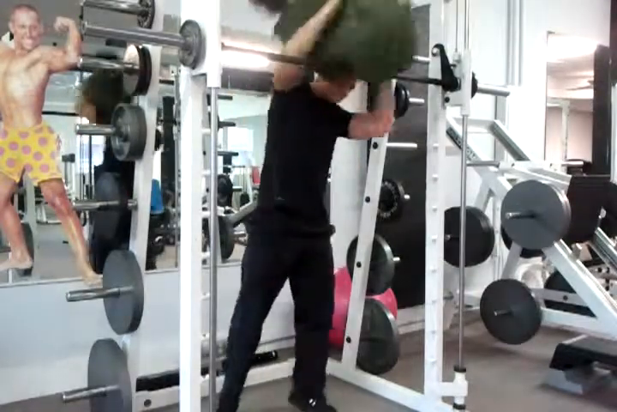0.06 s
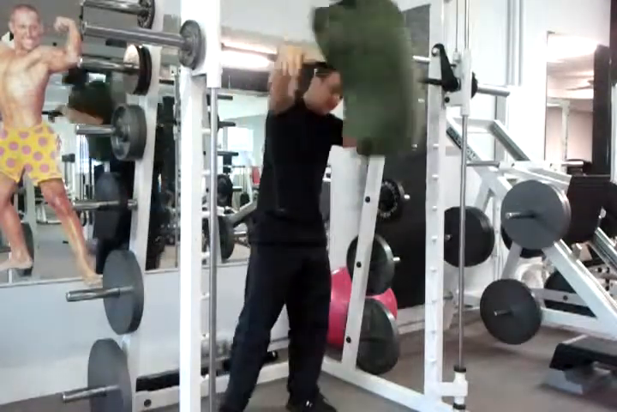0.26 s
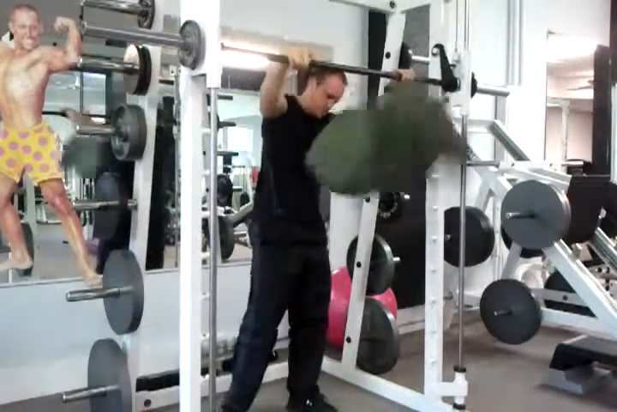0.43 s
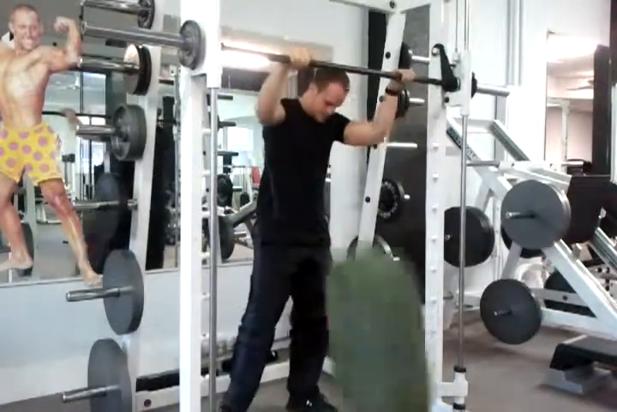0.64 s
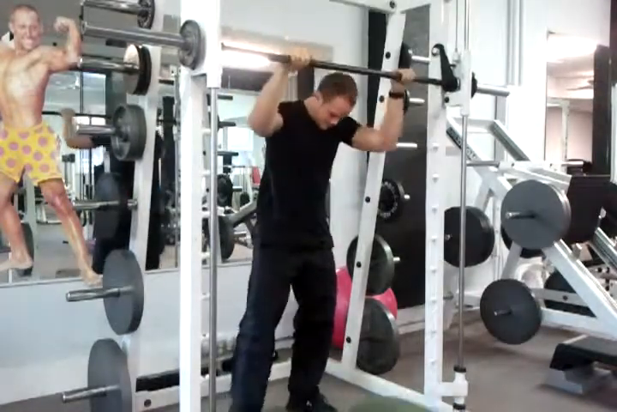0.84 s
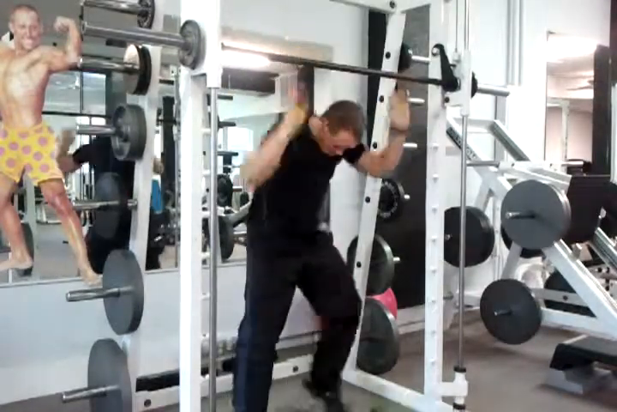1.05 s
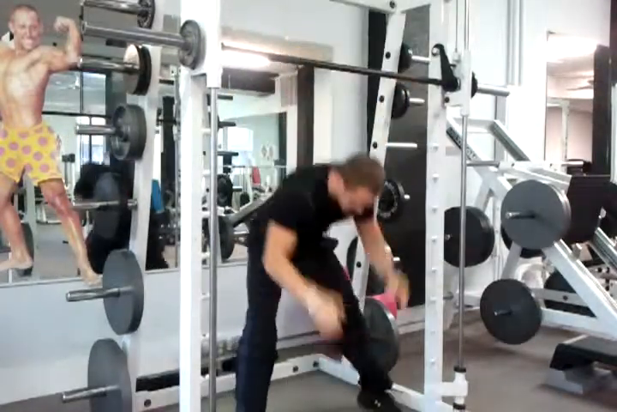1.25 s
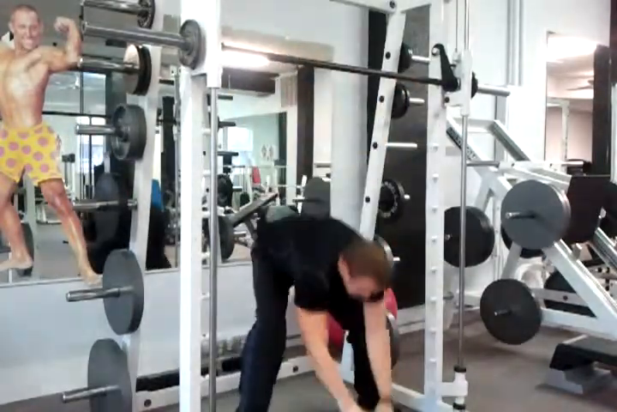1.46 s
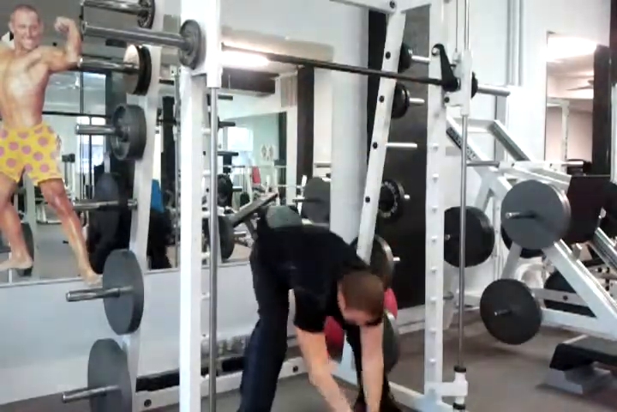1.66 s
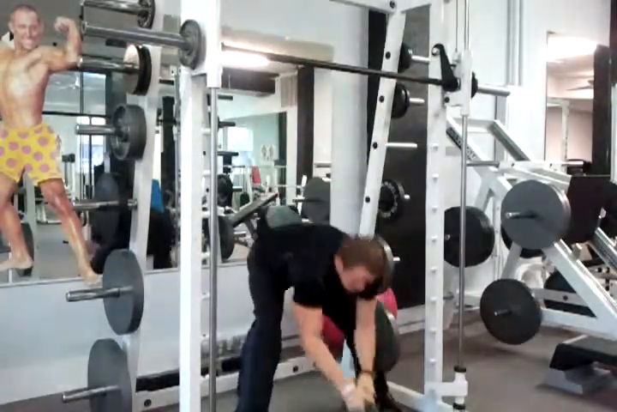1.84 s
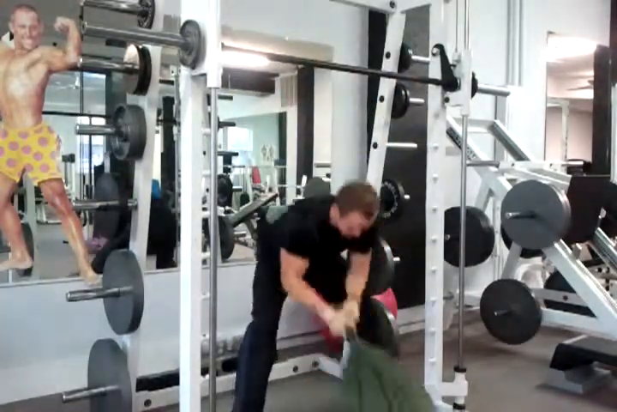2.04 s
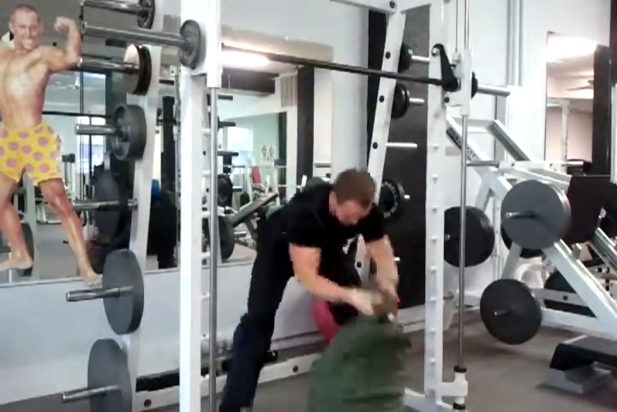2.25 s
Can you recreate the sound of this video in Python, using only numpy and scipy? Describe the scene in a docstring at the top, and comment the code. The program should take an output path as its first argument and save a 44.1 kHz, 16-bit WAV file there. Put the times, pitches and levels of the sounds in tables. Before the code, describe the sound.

A heavy sandbag clanks a steel bar, then slams onto an echoing gym floor

```python
"""Canvas rubs and sand shifts faintly in an echoing gym, then a steel bar clanks in its rack and rings.
A heavy sandbag is pushed over the bar, bumps the frame, falls and lands with a long thud.
Feet step up, the canvas is gathered and the bag is hauled off the floor.
Contacts, cloth and sand are shaped noise; the steel and the floor ring as decaying sines.
The hall adds early echoes and a diffuse tail; the two big blows overload a small mono recorder."""
import sys
import numpy as np
from scipy import signal
from scipy.fft import rfft, irfft
from scipy.io import wavfile

SR = 44100
rng = np.random.default_rng(int(sys.argv[2]) if len(sys.argv) > 2 else 0)


def master(y):
    """Save y as 16-bit WAV."""
    cut = np.clip(np.atleast_2d(y).T, -1, 1)
    pcm = np.round(cut * 32767)  # scale
    wavfile.write(sys.argv[1], SR, pcm.astype(np.int16))


N = 101430  # samples, 2.3 s
BAND_EDGE_HZ = 7980  # top of every noise and of the recorder


def from_db(db):
    """Decibels to amplitude gain."""
    return 10 ** (np.asarray(db) / 20)


def rms_one(x):
    """Scale to unit rms."""
    return x / np.sqrt(np.mean(x ** 2) + 1e-20)


def seconds():
    """The time of every sample."""
    return np.arange(N) / SR


def level_curve(points):
    """Gain that glides, in decibels, through (time_s, level_db) points."""
    return from_db(np.interp(seconds(), *np.transpose(points)))


def at_hz(points, hz):
    """Read a table on a log-frequency axis."""
    known_hz, values = np.transpose(points)
    return np.interp(np.log(hz + 1e-9), np.log(known_hz), values)


def noise(colour):
    """Unit-rms noise with the given spectrum, from 20 Hz up to the band edge."""
    hz = np.fft.rfftfreq(N, 1 / SR)
    in_band = (hz > 20) & (hz < BAND_EDGE_HZ)
    spectrum = rfft(rng.standard_normal(N)) * from_db(at_hz(colour, hz))
    return rms_one(irfft(spectrum * in_band, N))


def grain(depth_db, per_s):
    """A fast random flutter of level, of unit power."""
    steps = rng.standard_normal(N)
    flutter = np.interp(seconds() * per_s, np.arange(N), steps)
    return rms_one(from_db(depth_db * flutter))


def blow(start_s, level_db, attack_s, t60_s):
    """Envelope with a straight rise and an exponential fall."""
    age = seconds() - start_s
    rise = np.clip(age / attack_s, 0, 1)
    return rise * from_db(level_db - 60 * np.maximum(age - attack_s, 0) / t60_s)


def blows(rows):
    """Joint envelope of several blows, whose powers add."""
    return np.sqrt(sum(blow(*row) ** 2 for row in rows))


def ring(start_s, modes, attack_s, hold_s):
    """Sines that build up, hold while the contact lasts, then die away."""
    age = seconds() - start_s
    rise = np.clip(age / attack_s, 0, 1)
    free = np.maximum(age - attack_s - hold_s, 0)
    total = 0
    for pitch_hz, level_db, t60_s in modes:
        sine = np.sin(2 * np.pi * (pitch_hz * age + rng.random()))  # random starting phase
        total = total + from_db(level_db - 60 * free / t60_s) * sine
    return rise * total


def low_pass(x, hz):
    """A very steep low-pass that adds no delay."""
    taps = signal.firwin(801, hz, fs=SR, window=("kaiser", 9))
    return signal.fftconvolve(x, taps, "same")


# spectrum of the room tone: pitch_hz, density_db (relative, per Hz)
AIR_COLOUR = [(25, -42), (60, -18), (110, -6.5), (190, 3.5), (280, -3.5), (500, -1), (1000, -17.5),
              (2000, -28), (8000, -18.5)]
AIR_DB = -45


def room_tone():
    """Steady, low-pitched noise of the air in the room."""
    return from_db(AIR_DB) * noise(AIR_COLOUR)


# rubbing of the canvas: time_s, level_db
RUB = [(0, -45), (.07, -39), (.14, -35), (.2, -36), (.45, -36), (.6, -46.5), (.78, -47.5), (1.35, -49.5),
       (1.48, -37.5), (1.6, -42.5), (1.72, -43.5), (1.88, -50), (1.97, -44), (2.05, -35), (2.14, -29.5),
       (2.3, -30)]
# short scuffs of canvas and soles: start_s, level_db, attack_s, t60_s
SCUFFS = [(0.796, -27, 0.015, .2), (1.115, -24.5, .035, 0.11), (1.365, -40.5, 0.004, 0.3),
          (1.43, -36, 0.016, 0.24), (1.755, -38.5, 0.0096, 0.13)]
# spectrum of the cloth: pitch_hz, density_db (relative, per Hz)
CANVAS_COLOUR = [(100, -24), (500, -4), (1200, -4), (2200, -5), (4000, -3), (5500, -4), (7200, 1),
                 (8000, 5.5)]
CANVAS_ROOM_DB = -3  # send into the hall


def canvas():
    """Grainy friction of the coarse cloth: long rubs and short scuffs."""
    friction = np.hypot(level_curve(RUB), blows(SCUFFS))
    return noise(CANVAS_COLOUR) * grain(depth_db=1, per_s=650) * friction


# the sand shifts as the bag is heaved: time_s, level_db
HEAVE = [(0, -40.5), (.1, -34), (.2, -27), (.5, -28.5), (.72, -38), (.8, -33), (1.3, -55), (1.5, -46.5),
         (1.9, -42.5), (1.98, -33.5), (2.1, -32), (2.3, -36)]
# spectrum of the filling: pitch_hz, density_db (relative, per Hz)
SAND_COLOUR = [(30, -46), (100, -21.5), (190, -13.5), (300, -1.5), (480, 2.5), (850, 2.5), (1400, -3),
               (2500, -9), (8000, -31)]


def sand():
    """Dull, lumpy rustle of the filling as the bag bends."""
    return noise(SAND_COLOUR) * grain(depth_db=0.5, per_s=60) * level_curve(HEAVE)


# dull knocks of the bag on the frame and of feet on the floor: start_s, level_db, attack_s, t60_s
KNOCKS = [(0.217, -25.5, 0.0071, 0.16), (0.315, -17.5, 0.0096, 0.096), (0.42, -30, 0.016, 0.24),
          (0.485, -29.5, 0.016, 0.21), (0.569, -33, 0.0067, 0.35), (0.661, -34, 0.016, .3),
          (1.035, -17, 0.0096, 0.23), (1.095, -21, 0.0049, 0.063), (1.128, -23.5, .006, 0.14),
          (1.735, -43.5, 0.0105, 0.12), (2.002, -31.5, 0.021, 0.33), (2.063, -29.5, 0.0036, 0.13)]
# spectrum of a knock: pitch_hz, density_db (relative, per Hz)
KNOCK_COLOUR = [(30, -28), (90, -15.5), (160, -12), (300, -2), (550, 0), (1000, -1.5), (1700, -14.5),
                (4000, -19.5), (8000, -40.5)]
KNOCK_ROOM_DB = 1.5  # send into the hall


def knocks():
    """Soft, heavy contacts as swells of dull noise."""
    return noise(KNOCK_COLOUR) * blows(KNOCKS)


# the weight of the bag shakes the rack and the floor: start_s, level_db, attack_s, t60_s
THUMPS = [(0.218, -34, 0.0044, 0.12), (0.495, -38, 0.054, 0.36), (0.826, -7, 0.012, 0.22),
          (0.96, -30, 0.023, 0.27)]
# spectrum of a thump: pitch_hz, density_db (relative, per Hz)
THUMP_COLOUR = [(25, -39), (60, -17.5), (110, -2.5), (160, -3.5), (300, -6), (600, -20), (2000, -43)]
THUMP_ROOM_DB = -4.5  # send into the hall


def thumps():
    """The low push under the heaviest contacts."""
    return noise(THUMP_COLOUR) * blows(THUMPS)


# modes of the floor and the rack on it: pitch_hz, level_db (as excited by the landing), t60_s
FLOOR_MODES = [(158.5, -22, 0.81), (214, -27, 0.95), (292.2, -15.5, 0.74), (307.6, -20, 0.53),
               (377, -20.5, 0.45), (425, -25, 0.54), (559, -21, 0.93), (694.4, -25.5, .85), (713, -23, .7),
               (901, -22, 0.96), (940, -26.5, .65), (1135, -25.5, 0.44), (1147, -25, 0.48)]
BOOM_ATTACK_S, BOOM_HOLD_S = 0.06, 0.042  # for the landing
KNOCK_BOOM_DB = 4.5  # added to each knock's own level


def boom():
    """The floor's modes answer the landing and, more faintly, every knock."""
    slam_s = LANDING[1][0]
    total = ring(slam_s, FLOOR_MODES, BOOM_ATTACK_S, BOOM_HOLD_S)
    for start_s, level_db, attack_s, _ in KNOCKS:
        total = total + from_db(level_db + KNOCK_BOOM_DB) * ring(start_s, FLOOR_MODES, attack_s, 0)
    return total


# the bar strikes its hooks and chatters: start_s, level_db
CLANKS = [(0.207, -22), (0.213, 0.5), (0.219, -1.5), (0.233, -5), (0.253, -7), (0.271, -19.5), (0.312, -16)]
# bright crash of the contact: pitch_hz, density_db (relative, per Hz)
CLANK_COLOUR = [(30, -36), (80, -52), (160, -5), (400, -16), (1000, -10.5), (1600, -5.5), (2300, 3.5),
                (4200, -1), (6600, 5.5), (8000, -2)]
CLANK_ATTACK_S, CLANK_T60_S = 0.0015, 0.079
CLANK_ROOM_DB = 0  # send into the hall


def crash():
    """A quick run of bright steel contacts."""
    contacts = [(start_s, level_db, CLANK_ATTACK_S, CLANK_T60_S) for start_s, level_db in CLANKS]
    return noise(CLANK_COLOUR) * blows(contacts)


BAR_HZ, BAR_BEAT_HZ = 1886, 39  # second mode, and its distance above the first
# ring of the steel: pitch_hz, level_db (before BAR_DB), t60_s
BAR_MODES = [ (BAR_HZ - BAR_BEAT_HZ, -18, .42), (BAR_HZ, -13.5, .42), (1987, -24, .35), (2060, -26, .4),
             (2355, -27, .45), (2645, -31, .6), (2703, -25, .45), (3138, -32, .5), (3803, -29, .45),
             (4915, -26, .35), (5380, -27, .35), (6125, -23, .4), (6170, -24, .4), (7080, -29, .35)]
BAR_DB, BAR_ATTACK_S, BAR_HOLD_S = -2, 0.02, 0.12


def bar():
    """The steel rings on while the bar chatters; close modes beat."""
    first_clank_s = CLANKS[0][0]
    return from_db(BAR_DB) * ring(first_clank_s, BAR_MODES, BAR_ATTACK_S, BAR_HOLD_S)


# the bag slaps down, its sand collapses and it slumps over: start_s, level_db, attack_s, t60_s
LANDING = [(0.796, -18.5, 0.0022, .3), (0.826, -8, 0.015, 0.23), (0.851, -7.5, 0.02, 0.28),
           (0.888, -8.5, 0.0083, 0.51), (1.11, -19.5, 0.024, 0.15), (1.19, -29.5, 0.023, 0.14)]
# spectrum of the thud: pitch_hz, density_db (relative, per Hz)
LANDING_COLOUR = [(30, -33), (80, -23), (140, -4.5), (300, -1), (700, 3.5), (1200, 0.5), (2000, -3),
                  (4000, -11.5), (8000, -13.5)]
# the canvas snaps taut: start_s, level_db
SNAPS = [(0.827, -3), (0.853, 0.5), (0.87, -1.5)]
# spectrum of a snap: pitch_hz, density_db (relative, per Hz)
SNAP_COLOUR = [(60, -23), (600, 0.5), (2500, -4), (8000, -7)]
SNAP_ATTACK_S, SNAP_T60_S = 0.00057, 0.005
LANDING_ROOM_DB = -2  # send into the hall


def landing():
    """One end touches first, then the mass of sand slams down in lumps and the canvas snaps taut."""
    thud = noise(LANDING_COLOUR) * blows(LANDING) * grain(depth_db=2, per_s=140)
    snap_rows = [(start_s, level_db, SNAP_ATTACK_S, SNAP_T60_S) for start_s, level_db in SNAPS]
    return thud + noise(SNAP_COLOUR) * blows(snap_rows)


NEAR_WALL_DB, NEAR_WALL_SPAN_S = -4, (0.006, 0.05)  # joint level, range of delays


def near_walls(x, count=14):
    """Distinct early echoes from the mirrors, floor and ceiling, at random delays."""
    lags = (rng.uniform(*NEAR_WALL_SPAN_S, count) * SR).astype(int)
    echoes = sum(np.pad(x, (lag, 0))[:N] * (-1) ** k for k, lag in enumerate(lags))  # signs alternate
    return from_db(NEAR_WALL_DB) * echoes / np.sqrt(count)


# decay time of the hall: pitch_hz, t60_s
GYM_T60 = [(60, 0.33), (200, 0.71), (700, 0.93), (2000, 0.75), (5000, 0.56), (8000, 0.55)]
FIRST_ECHO_S, ECHO_BUILD_S = 0.0032, 0.004


def gym(x):
    """Diffuse tail: in each band the sound's power builds up and dies away, carried by noise."""
    edges = np.geomspace(45, 8400, 15)
    tail = 0
    for low, high in zip(edges, edges[1:]):
        sos = signal.butter(2, [low, high], "band", fs=SR, output="sos")
        t60_s = at_hz(GYM_T60, np.sqrt(low * high))
        dying = blow(FIRST_ECHO_S, 0, ECHO_BUILD_S, t60_s) ** 2
        band_power = signal.sosfilt(sos, x + 1e-18) ** 2
        power = signal.fftconvolve(band_power, dying / dying.sum())[:N]
        carrier = signal.sosfilt(sos, signal.sosfilt(sos, rng.standard_normal(N)))
        tail = tail + np.sqrt(np.abs(power)) * rms_one(carrier)
    return tail


def scene():
    """All sources meet at one microphone; the struck and rubbed ones also excite the hall."""
    sources = [(canvas(), CANVAS_ROOM_DB), (knocks(), KNOCK_ROOM_DB), (thumps(), THUMP_ROOM_DB),
               (crash(), CLANK_ROOM_DB), (landing(), LANDING_ROOM_DB)]
    direct = sum(x for x, room_db in sources)
    into_hall = sum(x * from_db(room_db) for x, room_db in sources)
    hall = near_walls(into_hall) + gym(into_hall)
    mono = room_tone() + sand() + boom() + bar() + direct + hall
    return np.array([mono, mono])


OVERLOAD_TOP, OVERLOAD_HARDNESS = 1.135, 7.7  # ceiling (full scale = 1), sharpness of the knee
CUTOFF_HZ = 16000  # low-pass after the clipping


def record(dry):
    """The input overloads, the band is narrowed, and what overshoots full scale is clipped again."""
    drive = np.abs(dry / OVERLOAD_TOP) ** OVERLOAD_HARDNESS
    squashed = dry / (1 + drive) ** (1 / OVERLOAD_HARDNESS)
    sides = []
    for side in squashed:
        clipped = np.clip(low_pass(side, BAND_EDGE_HZ), -1, 1)
        sides.append(low_pass(clipped, CUTOFF_HZ))
    return np.array(sides)


dry = scene()
out = record(dry)
master(out)
```